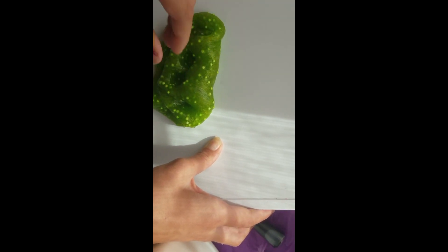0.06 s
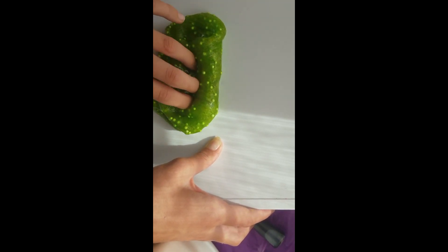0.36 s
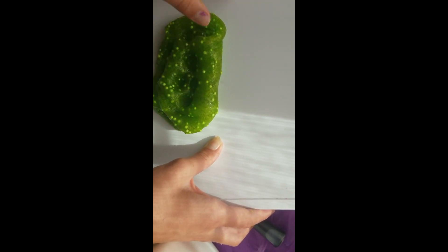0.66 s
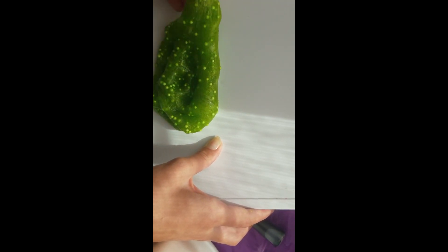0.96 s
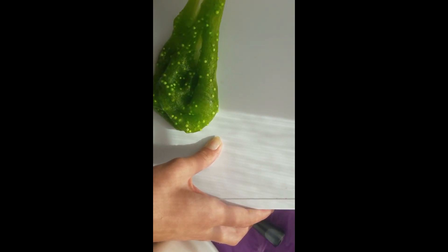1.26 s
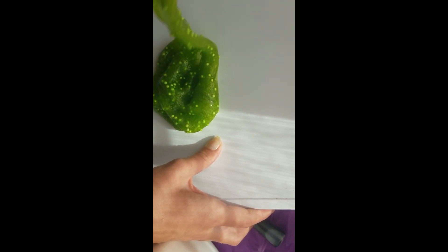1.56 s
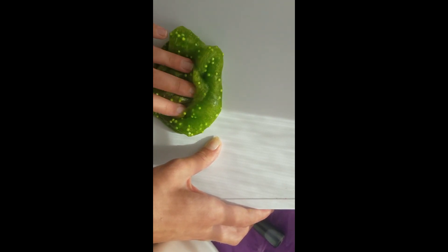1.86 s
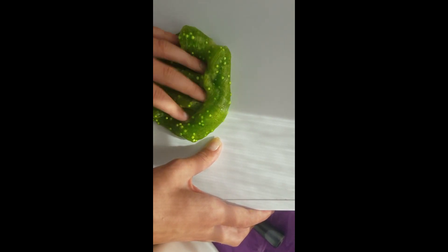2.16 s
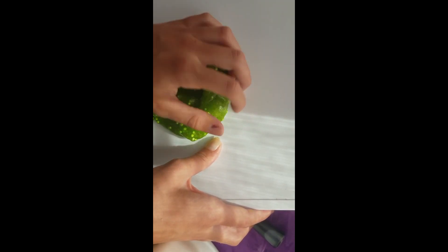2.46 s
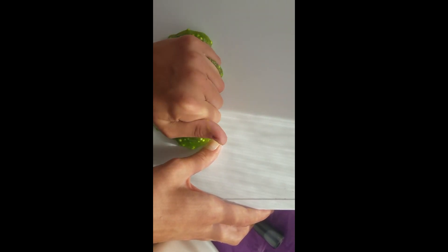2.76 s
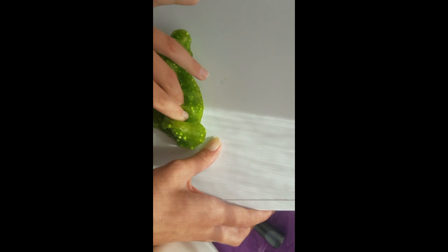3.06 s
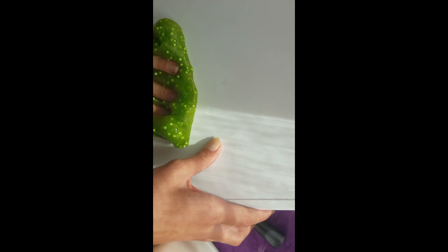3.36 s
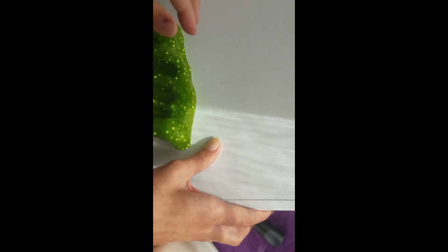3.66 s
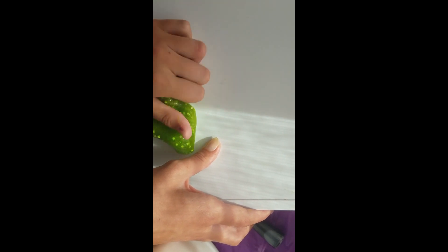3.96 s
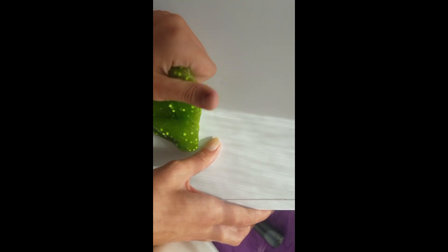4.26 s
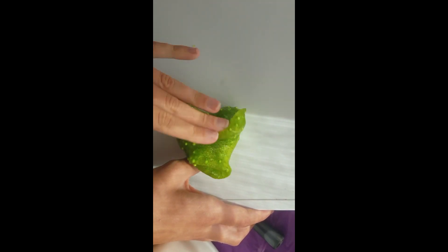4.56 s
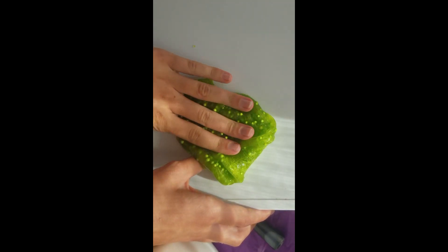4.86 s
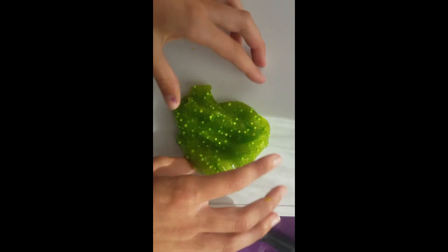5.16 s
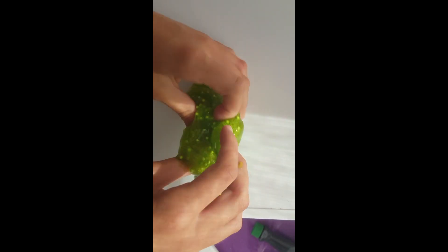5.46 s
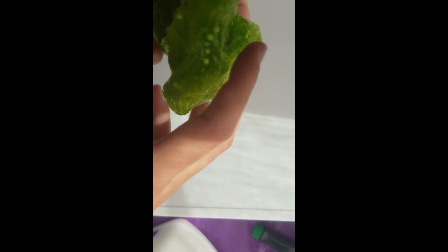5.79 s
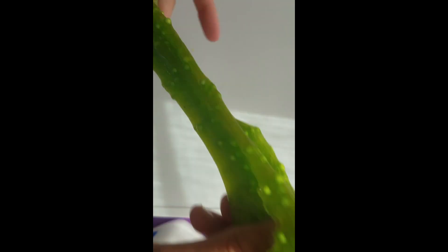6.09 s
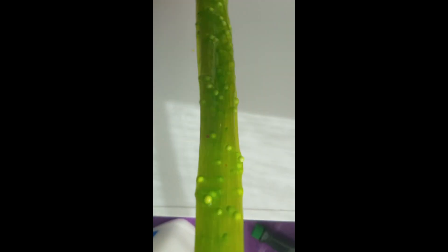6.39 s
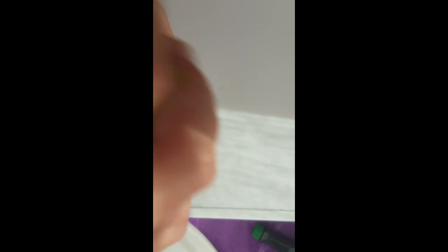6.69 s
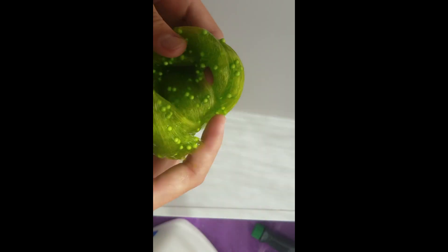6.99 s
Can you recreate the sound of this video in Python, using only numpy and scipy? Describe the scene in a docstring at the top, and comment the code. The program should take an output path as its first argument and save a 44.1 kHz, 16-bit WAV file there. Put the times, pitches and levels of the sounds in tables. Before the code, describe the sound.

Close to the microphone, hands work sticky bead slime on a table. Fingers poke it with sharp air pops and dull knocks, then a quieter stretch brings small ticks. Kneading follows, with rubbing, wet squelches and bursts of crackle as the slime peels away. After a few more thumps it thins to soft, sticky ticking. A faint low hum fills the small room.

```python
"""Sticky bead slime pops and crackles as hands squish, poke and stretch it on a table, close by.
Trapped air bursts its films in sharp pops or squelches out through wet gaps; threads and bubbles tick
as the slime peels away. Fingers knock the table through the lump, exciting its modes, and the lump
drags with a friction noise. A small room reverberates over a faint hum; midway the bass sinks a while."""
import sys
import numpy as np
from scipy import signal
from scipy.fft import rfft, irfft
from scipy.io import wavfile

SR = 44100
rng = np.random.default_rng(int(sys.argv[2]) if len(sys.argv) > 2 else 0)


def wav_record(signal):
    """Record a signal, one row per channel, as 16-bit PCM in the file named by sys.argv[1]."""
    frames = np.transpose(np.atleast_2d(signal))
    bounded = np.clip(frames, -1, 1)
    # unit amplitude maps onto the largest positive 16-bit level
    quanta = np.round(bounded * 32767).astype(np.int16)
    wavfile.write(sys.argv[1], SR, quanta)


N = 310023
TIME = np.arange(N) / SR
# A passing lull. Each row: time in seconds, bass gain in dB, gain of the room hiss in dB.
LULL_GAINS = [(2.72, 4, 6), (2.88, -8.5, -4), (3.1, -11, -5), (3.4, -26, -2.5), (3.65, -13.5, -3.5),
              (3.8, -11, 4), (4.5, -10, 2.5), (4.7, -6, 4), (4.95, 3, 7.5)]


def amp(db):
    """Converts decibels to an amplitude ratio."""
    return 10 ** (np.asarray(db) / 20)


def unit(x):
    """Normalises to an rms of one."""
    return x / np.sqrt(np.mean(x ** 2) + 1e-20)


def unit_attack(x, count):
    """Normalises a transient to an rms of one over its first samples."""
    return x / np.sqrt(np.mean(x[:, :count] ** 2) + 1e-20)


def read(points, hz):
    """Interpolates on a logarithmic frequency axis."""
    f, value = np.transpose(points)
    return np.interp(np.log(hz + 1), np.log(f + 1), value)


def curves(rows):
    """Interpolates each column of a timed table at every sample."""
    s, *columns = np.transpose(rows)
    return [np.interp(TIME, s, c) for c in columns]


def add(mix, start_s, sound):
    """Superposes a stereo sound on the mix."""
    part = mix[:, max(round(start_s * SR), 0):][:, :sound.shape[1]]
    part += sound[:, :part.shape[1]]


def colour(x, spectrum, size=2048):
    """Minimum-phase filter: follows the spectrum, then falls 20 dB in the octave past each end."""
    hz = abs(np.fft.fftfreq(size, 1 / SR))
    (low_hz, low_db), (high_hz, high_db) = spectrum[0], spectrum[-1]
    extended = [(low_hz / 2, low_db - 20), *spectrum, (high_hz * 2, high_db - 20)]
    log_gain = np.log(amp(read(extended, hz)))
    taps = np.fft.ifft(np.exp(np.conj(signal.hilbert(log_gain)))).real
    return signal.fftconvolve(x, taps[None, :size // 2], axes=1)[:, :x.shape[1]]


def resonate(x, hz, width_hz):
    """A resonance that may glide: shifts hz down to zero, smooths, and shifts back."""
    carrier = np.exp(2j * np.pi * np.cumsum(hz * np.ones(x.shape[1])) / SR)
    pole = np.exp(-np.pi * width_hz / SR)
    return (carrier * signal.lfilter([1 - pole], [1, -pole], x / carrier)).real


def stereo_noise(count, apart):
    """Partly coherent noise: an in-phase part plus an antiphase part."""
    mid, side = rng.standard_normal((2, count))
    return unit(np.array([mid + apart * side, mid - apart * side]))


def wander(hz):
    """Random fluctuation of rms one, low-passed near the given rate."""
    knots = rng.standard_normal(N // 50 + 1)
    lowpass = np.exp(-(np.fft.rfftfreq(len(knots), 50 / SR) / hz) ** 2)
    slow = irfft(rfft(knots) * lowpass, len(knots))
    return unit(np.interp(TIME, np.linspace(0, TIME[-1], len(knots)), slow))


def grains(per_s, spread_db, apart):
    """Shot noise: tiny snaps at random moments, a few much larger than the rest."""
    at = np.flatnonzero(rng.random(N) < per_s / SR)
    out = np.zeros((2, N))
    out[:, at] = stereo_noise(len(at), apart) * amp(spread_db * np.minimum(rng.exponential(1, len(at)), 4))
    return out


def strokes(rows, rise_shape, fall_shape):
    """Hand strokes add in power, each 20 dB down one rise before and one fall after its peak.
    Returns total dB, then power-weighted progress (-1 to 1, peak at 0) and further columns."""
    t = np.linspace(0, TIME[-1], N // 40)
    peak_s, rise_s, fall_s, db, *traits = np.transpose(rows)[:, :, None]
    progress = (t - peak_s) / np.where(t < peak_s, rise_s, fall_s)
    shape = np.where(t < peak_s, rise_shape, fall_shape)
    power = amp(db - 20 * abs(progress) ** shape) ** 2 + 1e-14
    weighted = [(power * c).sum(0) / power.sum(0) for c in (np.clip(progress, -1, 1), *traits)]
    return curves(np.transpose([t, 10 * np.log10(power.sum(0)), *weighted]))


def background(hum_hz=119.9, hum_db=-49.5, rumble_db=-58, draught_db=-77, hiss_db=-68.5):
    """The noise floor: a wavering hum, a rumble, a slight draught and room hiss in superposition."""
    # Noise spectra. Each row: frequency in Hz, relative level in dB.
    rumble_spectrum = [(15, -14), (40, -10), (60, -14), (95, 1), (140, 2), (190, -15.5), (280, -29)]
    hiss_spectrum = [(100, -26), (170, -8.5), (325, -6.5), (466, -10.5), (512, -11), (808, -17),
                     (906, -18.5), (2340, -23.5), (4310, -31), (9950, -35), (14000, -25), (16000, -33)]
    _, lull_db = curves(LULL_GAINS)
    phase = 2 * np.pi * hum_hz * TIME + .04 * wander(4)
    hum = np.sqrt(2) * np.sin(phase) * amp(hum_db - 0.4 * wander(6))
    rumble = amp(rumble_db + wander(8)) * unit(colour(stereo_noise(N, 0.9), rumble_spectrum, size=8192))
    draught = amp(draught_db) * np.array([wander(45), wander(45)])
    hiss = amp(hiss_db + lull_db) * unit(colour(stereo_noise(N, 0.83), hiss_spectrum))
    return hum + rumble + draught + hiss


def room(x, tail_db, early_db, early_s, first_s, mono_hz=650):
    """Reverberation: sparse early reflections and a diffuse tail, the bass alike on both sides."""
    # Room decay. Each row: frequency in Hz, time to fall 60 dB in seconds.
    decay_times = [(150, 1), (500, 0.32), (1500, 0.65), (4500, 0.37), (8000, 0.21), (14000, 0.11)]
    t = np.arange(SR) / SR
    hz, frame_s, noise = signal.stft(rng.standard_normal((2, SR)), SR, nperseg=256)
    decay = amp(-60 * frame_s / read(decay_times, hz)[:, None])
    tail = signal.istft(noise * decay, SR, nperseg=256)[1][:, :SR]
    early = rng.standard_normal((2, SR)) * (rng.random(SR) < 1200 / SR) * np.exp(-t / early_s)
    arrived = t > first_s
    mid, side = (amp(tail_db) * unit(tail * arrived) + amp(early_db) * unit(early * arrived)) / np.sqrt(SR)
    side = signal.sosfilt(signal.butter(2, mono_hz, "high", fs=SR, output="sos"), side)
    response = np.array([mid + side, mid - side]) / np.sqrt(2)
    return x + signal.fftconvolve(x, response, axes=1)[:, :N]


def placed(x):
    """A level difference between the channels leans the sound toward the fingers."""
    # Finger position. Each row: time in seconds, left minus right in dB.
    positions = [(0, -1), (0.55, -1), (1.2, 4), (2.2, -2), (4.3, 0), (5.35, -4), (5.95, 4.5), (6.2, -5.5),
                 (6.45, 1.5)]
    pan_db, = curves(positions)
    return x * amp(np.array([pan_db, -pan_db]) / 2)


def drag(width_hz=190, sag=.3, wetting_db=5):
    """Stick-slip friction sounds the hollow under the hand, whose pitch rises with the push."""
    # Shoves of the lump. Each row: peak time, rise and fall in seconds, level in dB,
    # dryness (hiss gain) in dB, top pitch of the hollow in Hz.
    shoves = [(0.725, .012, .3, -48.5, 2, 680), (2.228, 0.07, 0.028, -40, -16.5, 424),
              (2.5, 0.093, 0.16, -37, 0.5, 850), (2.68, .07, 0.046, -49.5, 2.5, 650),
              (2.945, .045, .1, -50.5, -1, 550), (3.555, .072, 0.042, -43.5, -9.5, 460),
              (3.82, 0.1, .11, -48, -5, 720), (3.905, .09, .11, -43, -12, 590),
              (3.98, 0.033, 0.093, -49, 0, 480.9), (4.255, .05, .11, -45, -4.5, 490),
              (4.34, .06, .12, -49, 2, 900), (4.98, .07, .19, -50, -9, 500),
              (5.33, .16, .04, -40, -21, 720), (5.38, .03, 0.19, -43.5, -7, 530)]
    # Friction spectra. Each row: frequency in Hz, relative level in dB.
    rub_spectrum = [(100, -10), (250, -2.5), (400, 0), (950, -5.5), (1250, -9.5), (2500, -33.5)]
    hiss_spectrum = [(800, -15.5), (1500, 5), (2200, -3), (3200, -5.5), (4500, -11.5), (7000, -15),
                     (12000, -36)]
    db, progress, dry_db, top_hz = strokes(shoves, rise_shape=2.06, fall_shape=1.11)
    hollow = resonate(grains(4000, 3, 0.13), top_hz * (1 - sag * abs(progress)), width_hz)
    hollow = unit(colour(hollow, rub_spectrum))
    rub = amp(-6) * unit(colour(grains(3000, 4.3, 0.26), rub_spectrum))
    hiss_db = dry_db - 2 - wetting_db * progress  # the contact gets wetter as it goes
    hiss = amp(hiss_db) * unit(colour(grains(5000, 2.4, 0.93), hiss_spectrum))
    return amp(db + 0.5 * wander(60)) * (hollow + rub + hiss)


def thumps(push_s=.003, ring_db=-11, knock_s=0.0075, typical_hz=420):
    """Impact excitation: a finger's blow gives a damped push, a knock and the table's modal ring."""
    # Blows. Each row: start in seconds, level in dB, pitch in Hz, hardness (relative knock level) in dB.
    blows = [(0.0062, -23.5, 540, -6), (0.0252, -18.5, 537, -14), (0.396, -40, 440, -7.5),
             (0.502, -44, 490, 2), (0.5256, -24.5, 450, -11.5), (0.5394, -18.5, 580, -14),
             (0.701, -22, 410, -10.5), (0.718, -21.5, 400, -12.5), (0.821, -43, 405, -20),
             (2.182, -35.5, 317, -11.5), (2.211, -38, 468, -15.5), (2.219, -33, 368.6, -14),
             (2.3693, -32.5, 360, -24.5), (2.386, -34.5, 398, -14), (2.397, -33.5, 207, -7),
             (2.469, -31.5, 413, -5.5), (2.5244, -24, 750, -10.5), (2.577, -34.5, 352, -9),
             (2.718, -19, 480, -9), (2.721, -21, 412, -9), (2.75, -34.5, 970, 2.5), (2.753, -38, 71, -4),
             (3.056, -51, 410, -5.5), (3.125, -56.5, 430, -10.5), (3.7165, -24, 532, -9),
             (3.723, -25, 425, -12.5), (3.962, -36, 388, -30), (4.926, -50.5, 502, 3),
             (5.055, -33.5, 373, -4.5), (5.1443, -22, 423, -4.5), (5.1658, -19, 390, -13.5)]
    # Table modes. Each row: nominal frequency in Hz, level in dB, time to fall 60 dB in seconds.
    modes = [(161, -10, 0.25), (220, -9.5, .08), (301, -9.5, 0.056), (379, 2, 0.085), (456.3, -1.5, 0.076),
             (532.2, -2.5, 0.04), (659, -4.5, .055), (847.5, -8.5, .06), (997, -8.5, 0.052),
             (1450, -19, 0.054), (1690, -21.5, 0.046)]
    # Contact noise. Each row: frequency in Hz, relative level in dB.
    knock_spectrum = [(120, -33.5), (400, -16), (900, 7.5), (1200, -3.5), (1600, -1.5), (2500, -17),
                      (5000, -28.5), (9000, -37)]
    out, t = np.zeros((2, N)), np.arange(6000) / SR
    for start_s, db, hz, hard_db in blows:
        decay_s = push_s * np.sqrt(typical_hz / hz)  # deeper pushes last longer
        push = -np.sin(2 * np.pi * hz * t) * np.exp(-t / decay_s)
        ring = 0
        for mode_hz, mode_db, t60 in modes:  # every spot on the table rings differently
            detuned_hz = mode_hz * (1 + rng.uniform(-1.1, 1) / 10)
            phase = 2 * np.pi * (detuned_hz * t + rng.random()) + .15 * rng.standard_normal((2, 1))
            ring += amp(mode_db - 60 * t / t60) * np.sin(phase)
        body = push + amp(ring_db) * ring * (1 - np.exp(-t / push_s))
        # a small patch of table radiates little below its own pitch
        body = unit_attack(signal.lfilter(*signal.butter(2, hz / 4, "high", fs=SR), body), count=350)
        contact = stereo_noise(len(t), 0.91) * np.exp(-t / knock_s)
        knock = unit_attack(colour(contact, knock_spectrum), count=440)
        add(out, start_s, amp(db) * (body + amp(hard_db - 2) * knock))
    return out


def squelches(glide=0.041, skew=2.1):
    """Fluttering air excites a narrowing gap's resonance: it swells, rises a little and stops short."""
    # Air escapes. Each row: start and length in seconds, level in dB, centre and bandwidth in Hz.
    escapes = [(0.5357, 0.004, -22, 4020, 900), (2.387, 0.045, -45.5, 1600, 700),
               (2.432, 0.095, -39.5, 2020, 1700), (2.681, .005, -31.5, 1650, 700),
               (2.759, .04, -40.5, 4480, 1508), (3.957, 0.092, -49.5, 2040, 1400),
               (4.318, 0.026, -42.5, 1790, 600), (5.065, 0.057, -50, 3340, 1500),
               (5.139, 0.015, -25, 962, 300), (5.27, 0.087, -46, 1590, 970),
               (5.285, 0.067, -39.5, 925, 397), (5.605, 0.036, -56.5, 1570, 700),
               (5.978, 0.018, -57.5, 1890, 1100)]
    out, flutter = np.zeros((2, N)), grains(2500, 1.8, 0.82)
    for start_s, length_s, db, hz, width_hz in escapes:
        progress = np.linspace(0, 1, round(length_s * SR))
        pitch = hz * (1 + glide * (progress - .5))
        air = flutter[:, round(start_s * SR):][:, :len(progress)]
        gap = resonate(resonate(air, pitch, width_hz), pitch, width_hz)
        swell = np.sqrt(abs(np.sin(np.pi * progress ** skew)))
        add(out, start_s, amp(db) * unit(gap) * swell)
    return out


def peel(per_s=1700, spread_db=3.0, clump_db=2.5, q=4, crowding=.3):
    """Adhesion fails in clumps of threads and bubbles; each bubble size resonates at its own pitch."""
    # Pulls off skin and table. Each row: peak time, rise and fall in seconds, relative level in dB.
    pulls = [(0.02, .01, 0.067, -34), (0.44, .12, 0.29, -65), (0.81, .12, .3, -55),
             (1.21, .045, 0.083, -54.5), (2.205, .05, .05, -39.5), (2.495, .125, .28, -50.5),
             (2.757, 0.0077, 0.082, -32), (2.96, .07, .08, -55), (3.525, .045, .075, -48.5),
             (3.83, .09, .15, -62.5), (3.97, .07, .08, -55.5), (4.1, .045, .085, -42.5),
             (4.34, .135, .15, -46.5), (4.64, .15, .08, -68), (4.962, .045, .1, -46.5),
             (5.1, .045, .095, -43.5), (5.4, .095, .2, -52), (5.63, .09, .18, -54), (6.18, .3, .5, -61),
             (6.455, 0.05, .12, -48), (6.69, .09, 0.29, -63), (6.97, .15, .15, -63)]
    # Crackle spectrum. Each row: frequency in Hz, relative level in dB.
    crackle_spectrum = [(400, -12.5), (1500, -2.5), (4000, -2), (6500, -6.5), (8500, -3.5), (10000, -5.5),
                        (12500, 1), (15000, 2), (16500, 1)]
    db, _ = strokes(pulls, rise_shape=1.8, fall_shape=1.15)
    density = amp(crowding * np.maximum(db - db.max(), -45))  # harder pulls tick more densely
    bubble_hz = np.geomspace(900, 15000, 10)
    ticks = 0
    for hz in bubble_hz:
        rate = per_s * density * np.sqrt(hz / bubble_hz.mean())  # small bubbles tick most often
        ticks += signal.lfilter(*signal.iirpeak(hz, q, fs=SR), grains(rate, spread_db, 0.95))
    crackle = unit(colour(ticks / np.sqrt(density), crackle_spectrum))
    return amp(db - 1 + clump_db * wander(70)) * crackle


def pops(snap_s=0.00052, rise_s=.0002, echo_s=0.0021, echo_gain=0.17, spray_s=0.0099, spray_db=-19):
    """A film ruptures over trapped air: a pressure pulse, its reflection off the table, a wet spray."""
    # Air pockets. Each row: start in seconds, core level (5-10 kHz) in dB,
    # then the body below and the sizzle above that band in dB relative to the core.
    pockets = [(0.0056, -22, -2, -2), (0.0173, -40, 5, 6), (0.025, -31, 7.5, -5), (0.077, -43.5, -1, 3),
               (0.1015, -49, -9.5, -3), (0.3078, -65.5, 6, -10), (0.396, -61.5, 5.5, 2),
               (0.5235, -28, -3, 8), (0.5375, -33.5, 7, 7), (0.719, -44.5, 8, -9), (0.817, -38, -6, 9.5),
               (1.2428, -56, -10, 7), (1.3412, -57.5, -10, 10), (1.352, -57, -8, 12),
               (1.6766, -57.5, 1, -1.5), (2.1613, -54, -1.5, 7), (2.2078, -46.5, 4.5, -4),
               (2.2474, -55.5, 3, 0), (2.5235, -43.5, 9.5, 4.5), (2.6507, -53, 12, -5),
               (2.6715, -46, -4, 4), (2.6997, -40.5, -1.5, 10), (2.7104, -41, -5.5, 1),
               (2.718, -33, 8, 7.5), (2.7254, -38, -0.5, 7), (2.7506, -26.5, 5, 15.5),
               (2.7648, -37.5, 2.5, 17.5), (3.052, -60, 1.5, 6), (3.4567, -64, 1.5, -11),
               (3.7153, -51.5, -1, 1.5), (4.063, -36.5, -3, -2), (4.0756, -46, -7, 3),
               (4.097, -43.5, -6, 1), (4.1068, -40.5, 6.5, 5), (4.139, -36, -5.5, -13),
               (4.1515, -48, 1.5, 11), (4.417, -53.5, 6, -14), (4.4683, -57.5, -16, 2.5),
               (4.762, -61, -3.5, 12), (4.9699, -49.5, 1, 10), (5.374, -53.5, -10, 13), (5.457, -57, -5, 9),
               (5.5622, -41, -7.5, 0), (5.6624, -54.5, -9, 5), (5.9841, -57.5, -6.5, 0), (6.095, -58, 4, 9),
               (6.144, -71, -12, 13), (6.1702, -63.5, -11.5, 13.5), (6.233, -63, -10, 9),
               (6.3086, -66, 0, 8), (6.415, -69, -8, 18), (6.4524, -51, 0.5, 3), (6.9814, -71, 0.5, 13)]
    # Spectra of the three bands. Each row: frequency in Hz, relative level in dB.
    body = [(200, -22), (500, -13.5), (950, 0), (1700, -11.5), (2600, -4), (4400, -6), (5500, -12.5),
            (7000, -28)]
    core = [(3500, -30), (5500, -4.5), (6500, 2), (7400, -1.5), (8500, 4.5), (10000, -5), (12000, -27.5)]
    sizzle = [(8500, -32.5), (11000, -3), (13000, -4), (15000, 2), (16500, -9)]
    out, t = np.zeros((2, N)), np.arange(2048) / SR
    snap = np.exp(-t / snap_s) + echo_gain * np.exp(-abs(t - echo_s) / snap_s)
    envelope = (1 - np.exp(-t / rise_s)) * (snap + amp(spray_db) * np.exp(-t / spray_s))
    for start_s, db, body_db, sizzle_db in pockets:
        burst = stereo_noise(len(t), apart=0.68) * envelope
        bands = (body, body_db), (core, 0), (sizzle, sizzle_db)
        pop = sum(amp(band_db) * unit_attack(colour(burst, band), count=180) for band, band_db in bands)
        add(out, start_s, pop * amp(db))
    return out


def scene():
    """Superposes the bright and dull slime sounds, each reverberated, on the noise floor."""
    bright = room(placed(pops() + peel()), tail_db=-20.5, early_db=-11.5, early_s=.026, first_s=0.0048)
    dull = room(thumps() + drag() + squelches(), tail_db=-18.5, early_db=-8, early_s=.012, first_s=0.0038)
    return bright + dull + background()


def record(dry, bass_hz=240, edge_hz=16150):
    """A varying shelf filter sinks and restores the bass; clipping and a band limit follow."""
    bass_db, _ = curves(LULL_GAINS)
    bass = signal.sosfiltfilt(signal.butter(3, bass_hz, fs=SR, output="sos"), dry)
    shelved = dry + (amp(bass_db) - 1) * bass
    lowpass = signal.firwin(301, edge_hz, window=("kaiser", 8), fs=SR)
    return signal.oaconvolve(np.clip(shelved, -1, 1), lowpass[None], "same")


dry = scene()
out = record(dry)
wav_record(out)
```